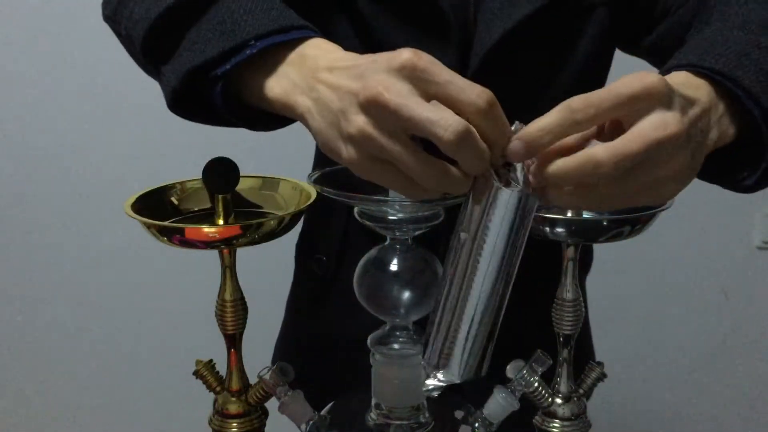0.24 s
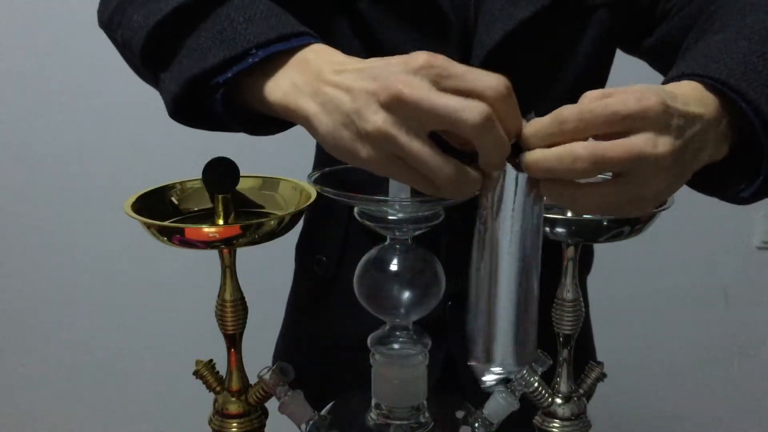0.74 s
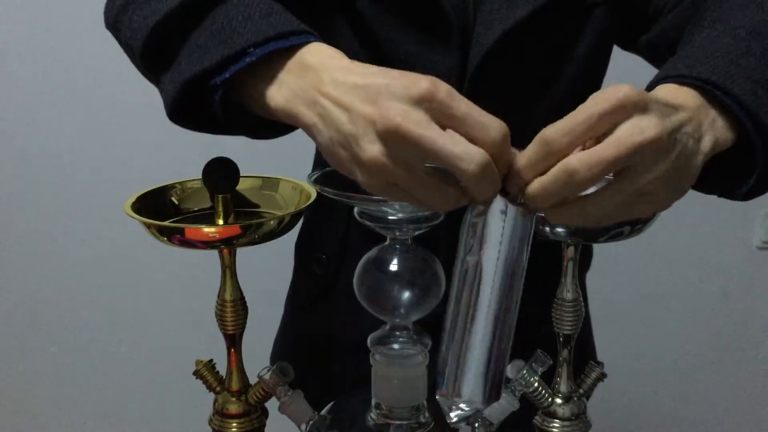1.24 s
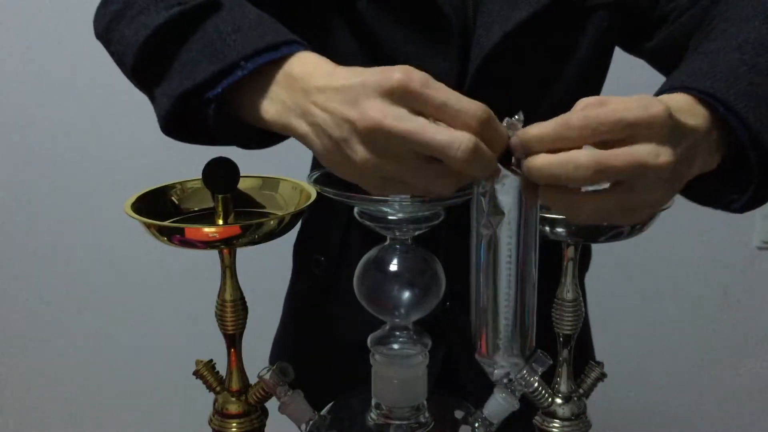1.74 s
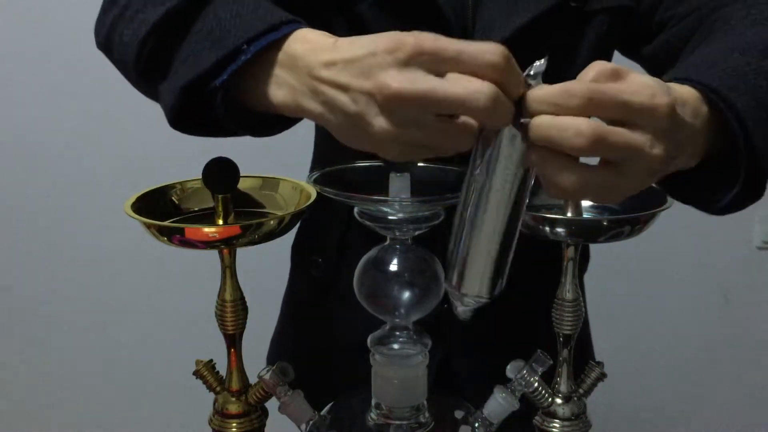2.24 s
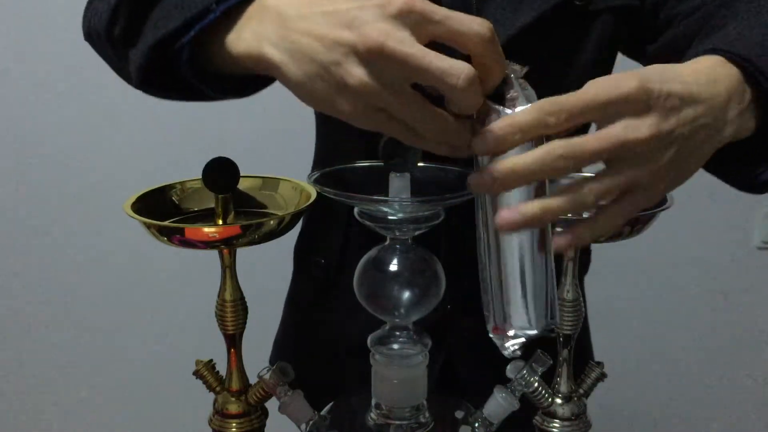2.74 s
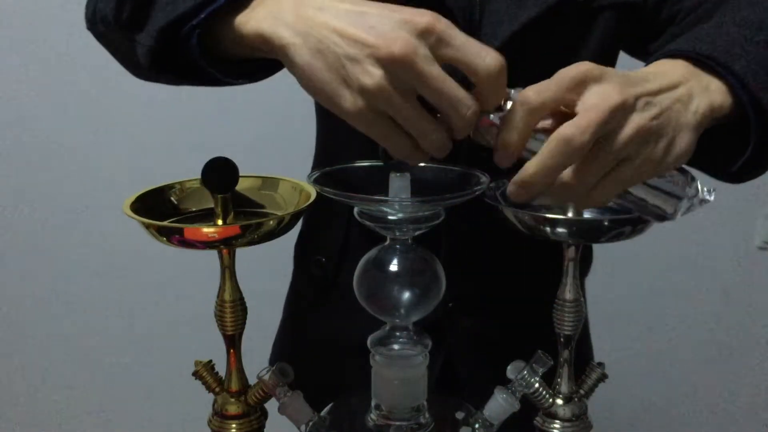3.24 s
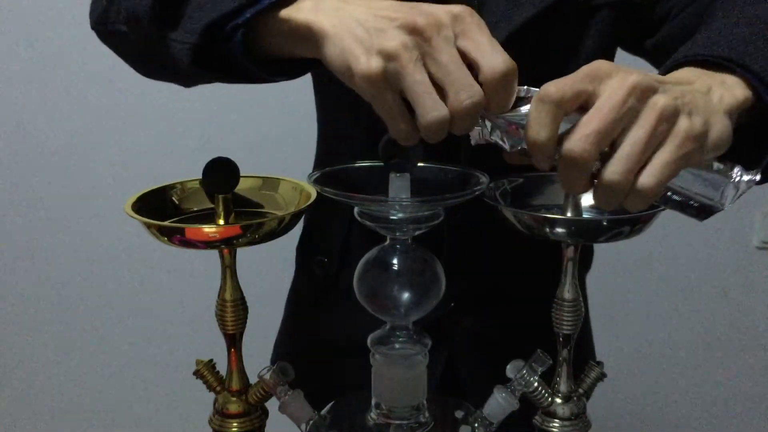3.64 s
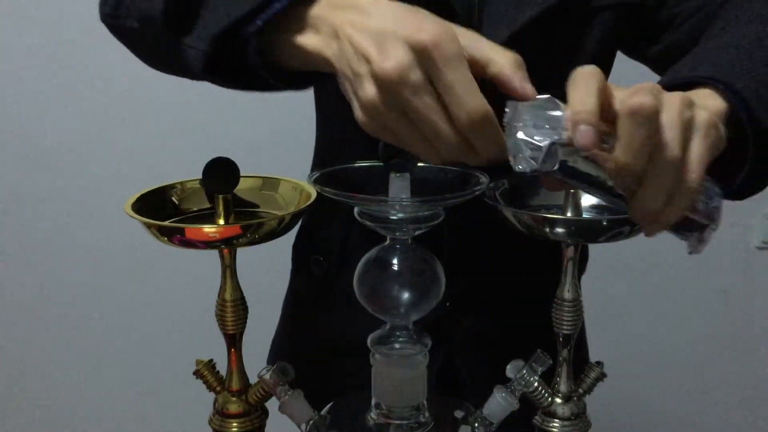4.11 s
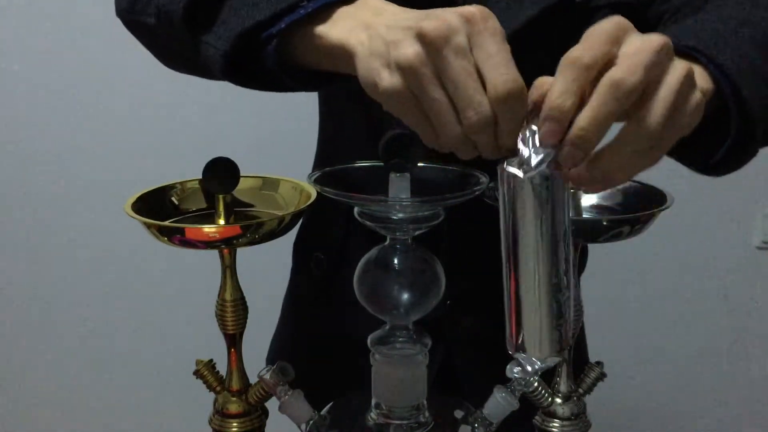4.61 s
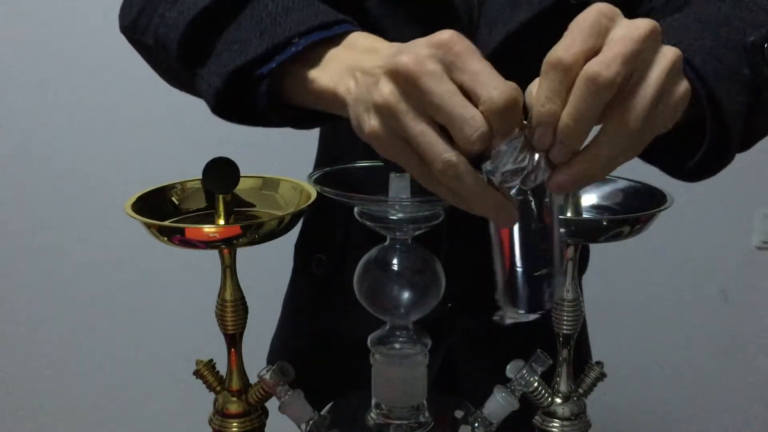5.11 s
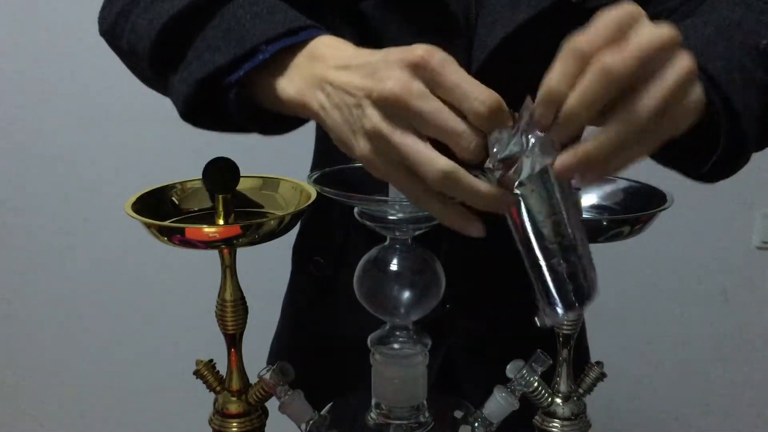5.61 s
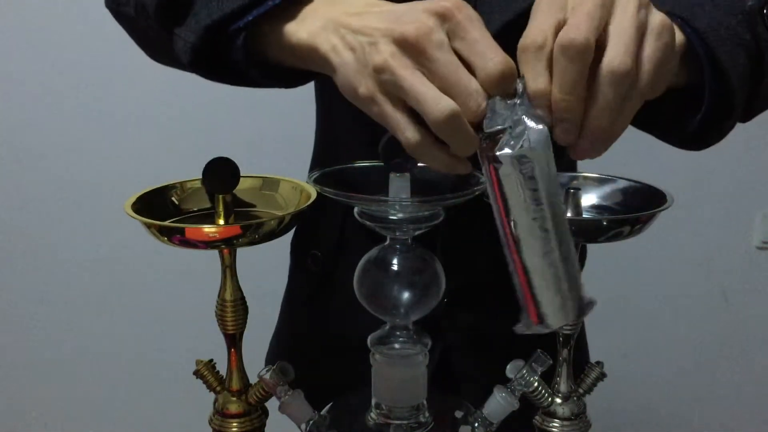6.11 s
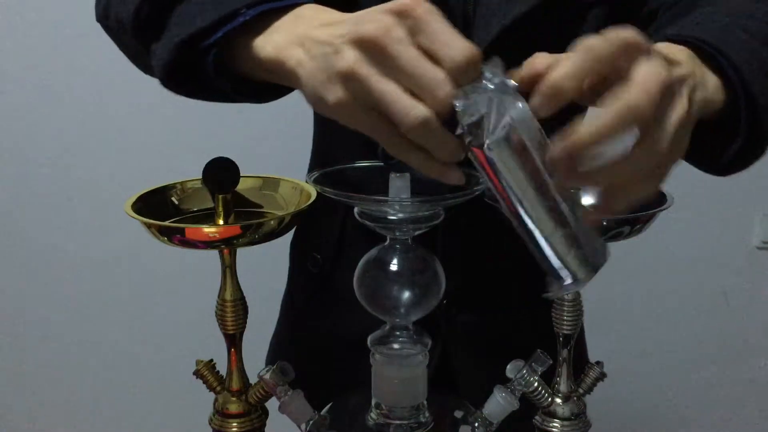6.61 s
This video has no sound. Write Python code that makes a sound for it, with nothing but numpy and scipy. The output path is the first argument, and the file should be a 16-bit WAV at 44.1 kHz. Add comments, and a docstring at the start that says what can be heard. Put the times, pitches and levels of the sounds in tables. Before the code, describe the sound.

Stiff foil crackles continuously but irregularly under working fingers: tiny ticks, sharp metallic pops and occasional louder cracks. It thickens around two and a half to three seconds, stops and starts through the middle, then gives its strongest snaps just after six seconds and near the end, with a low thud. Fairly close pickup in a small reverberant room, quiet hum below.

```python
"""Fingers twist and tear open a foil-wrapped roll in a bare, hard-walled room, an arm's length from a camera.
Each crease buckles in a snap about a millisecond long: a patch of foil rings, its edge cracks, the dent pops.
Lesser snaps and small creases fall at random while the fingers move and fill the gaps; the room answers every snap; a low hum and faint hiss lie beneath."""
import sys
import numpy as np
from scipy import signal
from scipy.fft import rfft, irfft, next_fast_len
from scipy.io import wavfile
from scipy.ndimage import map_coordinates

SR = 44100
rng = np.random.default_rng(int(sys.argv[2]) if len(sys.argv) > 2 else 0)


def to_wav(sig):
    """Store sig (one row per channel, or 1-D mono) as 16-bit WAV at the path in sys.argv[1].

    Samples outside -1..1 are clipped; the rate is SR.
    """
    pcm = np.clip(np.atleast_2d(sig), -1, 1) * 32767
    pcm = np.round(pcm).astype(np.int16)
    wavfile.write(sys.argv[1], SR, pcm.T)  # frames by channels


N = 302526

# the loudest buckling creases: (s, patch dB, patch pitch Hz, crack dB, crack pitch Hz, dent dB, dent pitch Hz)
SNAPS = [(0.014, -43.5, 1460, -38, 8610, -42.5, 704), (0.0817, -24.5, 3340, -23.5, 6400, -43.5, 930),
         (0.1681, -44, 2130, -37, 6320, -57, 790), (0.1811, -34, 1520, -52, 8130, -38.5, 800),
         (0.1851, -26.5, 2480, -20, 10860, -35, 860), (0.2713, -26, 1870, -34, 5600, -36.5, 940),
         (0.2845, -35, 1540, -27.5, 7980, -40, 870), (0.4061, -39, 2130, -38, 7510, -54, 810),
         (0.4612, -48, 2990, -37, 6540, -54, 790), (0.4713, -40, 3200, -34, 5900, -50, 995),
         (0.4751, -34, 3240, -41, 6180, -57, 950), (0.4941, -35, 2780, -30, 8960, -46, 613),
         (0.4976, -22.5, 2840, -25, 10300, -43.5, 570), (0.5055, -36, 2760, -37, 8490, -60, 670),
         (0.5507, -35, 3090, -37, 7560, -56, 840), (0.5885, -36, 3360, -22, 7800, -53, 870),
         (0.6097, -36, 2380, -35, 5950, -47, 820), (0.6195, -46, 2640, -31, 8200, -66, 560),
         (0.6653, -34, 3300, -29, 8400, -51, 960), (0.688, -34, 2130, -40, 6710, -46, 940),
         (0.6935, -40, 3210, -22.5, 6360, -55, 750), (0.7043, -38, 3200, -29, 6320, -45, 665),
         (0.7121, -28, 3550, -36, 7710, -38, 557), (0.7228, -26, 2830, -32, 6610, -39, 815),
         (0.7357, -30.5, 3200, -35, 7840, -66, 590), (0.7451, -33, 2730, -29, 6200, -62, 580),
         (0.8325, -33.5, 2470, -29, 7540, -43.5, 684), (0.8615, -44, 2350, -24, 11540, -71, 890),
         (0.9112, -62, 2200, -32.5, 6260, -77, 990), (1.0304, -43, 3850, -20.5, 8000, -61, 630),
         (1.0382, -32.5, 2520, -23, 9610, -39, 590), (1.0643, -32, 3200, -28.5, 6800, -36, 596),
         (1.1315, -39, 3830, -34.5, 6170, -50, 730), (1.1517, -56, 1330, -34, 6160, -34, 840),
         (1.224, -35.5, 2990, -30.5, 9760, -48, 750), (1.3036, -37, 2800, -32, 8000, -64, 760),
         (1.31, -32, 3270, -29, 8100, -47, 800), (1.3634, -26.5, 3470, -13.5, 9500, -46, 920),
         (1.3751, -48, 3410, -47, 6220, -75, 930), (1.3787, -22.5, 3330, -38, 6030, -65, 950),
         (1.386, -35, 2650, -25, 7500, -61, 900), (1.4328, -38, 2450, -30, 10200, -60, 920),
         (1.4731, -20, 2710, -28, 6160, -42, 845), (1.5761, -43, 2150, -19, 11800, -60, 630),
         (1.5858, -34, 2560, -39, 6500, -41.5, 770), (1.6073, -40, 2440, -35, 10030, -57, 760),
         (1.6124, -30.5, 3520, -33, 7610, -50, 760), (1.619, -40, 2250, -39, 9370, -44.5, 660),
         (1.628, -48, 3060, -32, 8390, -55, 770), (1.6612, -41, 3760, -31.5, 7330, -58, 870),
         (1.6688, -45, 2430, -35, 8460, -47, 790), (1.679, -44, 3160, -40, 8000, -64, 750),
         (1.6941, -54, 1600, -51, 6120, -41.5, 750), (1.7943, -38, 1990, -36, 7770, -50, 890),
         (1.8017, -40, 2010, -54, 6670, -62, 780), (1.8215, -41.5, 2110, -39.5, 5710, -48, 880),
         (1.8307, -36, 2600, -34, 6750, -43, 960), (1.9015, -41, 3700, -52, 5790, -59, 930),
         (1.9059, -41, 2550, -36.5, 6800, -63, 810), (1.9383, -46, 2330, -29, 7750, -66, 950),
         (1.9578, -41.5, 1540, -14, 10100, -43.5, 950), (1.9628, -33, 3640, -28, 9480, -57, 890),
         (1.9799, -36.5, 1860, -26, 6600, -44.5, 700), (1.9915, -32, 3650, -29, 9440, -61, 780),
         (1.9955, -43, 2930, -34, 11150, -52, 890), (2.0891, -25, 2970, -23.5, 7850, -53, 830),
         (2.0975, -31.5, 2460, -39, 5990, -49, 586), (2.1078, -31, 1970, -28, 6090, -36, 653),
         (2.1133, -44, 2590, -39, 5730, -59, 590), (2.1292, -30.5, 2720, -22.5, 6150, -63, 610),
         (2.1611, -36, 2040, -20, 7400, -49, 740), (2.2331, -39, 2960, -22.5, 7200, -71, 540),
         (2.2984, -40, 2780, -31.5, 7820, -61, 840), (2.3558, -56, 3440, -31.5, 5910, -73, 660),
         (2.3643, -51, 3680, -29, 7830, -57, 780), (2.3764, -45, 3770, -34, 10860, -60, 820),
         (2.3813, -38.5, 3360, -28, 8160, -41.5, 825), (2.4022, -31, 1420, -16.5, 11400, -28, 900),
         (2.409, -27, 2400, -25, 7140, -40, 600), (2.4483, -42, 1360, -46, 8810, -34, 850),
         (2.4604, -31, 2720, -29, 6030, -64, 750), (2.6135, -48, 3860, -23, 8500, -56, 780),
         (2.6171, -48, 3640, -38, 9080, -69, 720), (2.6276, -50, 2480, -35, 7970, -42, 535),
         (2.6404, -44, 3660, -33, 7220, -58, 570), (2.6493, -41, 3610, -39, 5830, -61, 890),
         (2.66, -35, 3840, -34, 7760, -58, 760), (2.681, -29.5, 2540, -30, 10270, -44, 746),
         (2.6854, -29.5, 1870, -32, 5770, -60, 880), (2.6916, -28, 3440, -24, 8720, -46, 950),
         (2.6987, -28, 2000, -27, 6510, -36, 870), (2.7084, -28, 2970, -31, 7660, -41.5, 644),
         (2.7135, -29, 2140, -32, 5760, -40, 550), (2.7172, -27, 2930, -43, 5880, -40, 520),
         (2.7362, -33, 1900, -25, 6100, -41, 510), (2.7501, -31, 1910, -36, 6010, -46, 880),
         (2.7642, -29, 2270, -18, 11850, -39, 530), (2.7775, -24.5, 2840, -24.5, 6340, -31, 790),
         (2.8072, -36, 1840, -31, 6800, -50, 970), (2.8606, -26.5, 1980, -24, 8410, -43, 720),
         (2.869, -32, 2000, -37, 7390, -42, 920), (2.8734, -30, 2700, -40, 5890, -42, 760),
         (2.8984, -32, 2330, -44, 6300, -35, 650), (2.9815, -26, 3130, -24, 6760, -51, 700),
         (2.9941, -28.5, 2120, -38, 6000, -45, 540), (3.0, -25, 3050, -26.5, 9440, -40, 520),
         (3.0211, -34, 2980, -43, 5910, -60, 970), (3.0406, -39, 2270, -29, 10760, -62, 990),
         (3.0819, -57, 3090, -34.5, 6730, -61, 780), (3.1372, -34, 2540, -21.5, 8800, -42.5, 786),
         (3.1435, -43, 3570, -40, 8800, -57, 940), (3.1825, -33.5, 2380, -23.5, 11200, -49, 830),
         (3.2151, -32.5, 3560, -27, 8200, -46, 870), (3.2319, -37, 2940, -38, 8820, -48, 880),
         (3.2358, -31, 2970, -28, 10230, -51, 870), (3.241, -30.5, 2930, -31, 7870, -59, 910),
         (3.2519, -35, 3090, -38, 8030, -46, 880), (3.3422, -23.5, 2900, -33, 6240, -46, 790),
         (3.3601, -26, 1570, -16.5, 7650, -34.5, 770), (3.3822, -27, 2850, -28, 7940, -40, 950),
         (3.3991, -29.5, 1940, -30, 6800, -47, 950), (3.4145, -36, 2040, -24.5, 8400, -42.5, 840),
         (3.5607, -55, 3620, -28.5, 6700, -75, 910), (3.6171, -44, 2230, -40, 6400, -63, 940),
         (3.6569, -30.5, 2960, -28.5, 9100, -67, 770), (3.689, -38, 3340, -42, 6480, -50.5, 560),
         (3.7134, -32, 3130, -33, 5750, -49, 890), (3.7468, -31, 3860, -22, 9800, -58, 880),
         (3.7578, -34, 2540, -31, 6440, -57, 880), (3.7657, -39, 3060, -23, 9570, -64, 930),
         (3.7769, -43, 2760, -36, 8470, -66, 820), (3.8128, -42, 2690, -23.5, 8140, -69, 760),
         (3.8402, -25, 3520, -20, 6850, -46, 890), (3.8485, -35, 1920, -27, 6050, -40, 880),
         (3.9139, -38, 2950, -29.5, 8430, -64, 940), (3.9271, -33, 3030, -38, 6240, -57, 930),
         (3.9466, -35, 3070, -31, 9680, -45, 705), (3.9754, -32.5, 3270, -32, 8160, -41, 800),
         (3.9925, -31, 3310, -43, 6160, -39, 820), (3.9981, -34, 2240, -27.5, 8060, -39, 940),
         (4.0747, -36, 3080, -32, 8260, -58, 870), (4.0928, -30.5, 3940, -27.5, 8040, -45.5, 700),
         (4.1405, -29.5, 3170, -39, 5870, -38, 680), (4.2333, -33.5, 3260, -30, 11340, -63, 650),
         (4.2378, -41, 1900, -36, 7640, -48, 840), (4.2443, -38, 2780, -26.5, 10560, -46, 935),
         (4.2533, -30, 3280, -34, 10200, -47, 685), (4.2999, -34, 2190, -46, 7830, -53, 790),
         (4.3184, -38, 2670, -46, 5850, -52, 840), (4.3412, -30, 1890, -33.5, 7070, -56, 910),
         (4.3567, -30.5, 2870, -37, 5760, -44, 760), (4.3739, -44, 2320, -35, 6430, -52, 950),
         (4.3784, -29, 2920, -39, 8100, -52, 970), (4.3825, -33, 3150, -24.5, 8870, -46, 930),
         (4.406, -30, 2520, -26, 5800, -42, 820), (4.422, -22, 2640, -26, 6200, -34, 825),
         (4.4276, -26.5, 1530, -20.5, 9600, -38, 810), (4.4363, -39, 1930, -28, 7810, -53, 780),
         (4.4451, -38, 1820, -36, 6840, -48, 900), (4.4964, -33.5, 1760, -46, 5780, -39.5, 725),
         (4.5372, -39, 2590, -44, 8430, -40.5, 810), (4.5413, -26, 2220, -22, 8140, -37.5, 810),
         (4.6248, -39.5, 1560, -51, 5890, -34.5, 740), (4.7219, -24.5, 2650, -27.5, 8300, -51, 920),
         (4.7263, -48, 2550, -46, 7020, -54, 890), (4.7834, -42, 2560, -48, 6900, -61, 840),
         (4.8579, -40, 2610, -42, 7610, -45.5, 576), (4.8621, -32, 2490, -35, 7190, -52, 590),
         (4.9565, -40, 3310, -33, 11120, -53, 600), (4.9679, -36, 3150, -36, 6190, -36.5, 624),
         (4.9723, -28.5, 2800, -34, 6700, -43, 664), (4.9766, -25, 3160, -42, 6440, -45, 630),
         (4.9864, -22.5, 3360, -41, 5800, -42.5, 800), (4.9951, -24.5, 3500, -43, 6500, -61, 680),
         (5.0414, -31, 3670, -39, 6040, -55, 950), (5.0873, -24, 3240, -15.5, 7650, -36.5, 710),
         (5.1523, -29, 3840, -17, 11200, -44, 700), (5.1739, -41, 3750, -24, 8950, -50, 640),
         (5.1886, -20, 2920, -29, 6950, -42, 820), (5.193, -31, 3470, -38, 8030, -40.5, 790),
         (5.2138, -34, 3430, -42, 6010, -53, 840), (5.2876, -38, 2720, -53, 6070, -64, 970),
         (5.3187, -29, 3160, -54, 5750, -45.5, 980), (5.3641, -33.5, 3230, -57, 6600, -69, 1010),
         (5.3998, -37, 2020, -43, 6750, -59, 990), (5.4143, -28, 3800, -22, 10200, -67, 930),
         (5.4787, -24, 2500, -38, 5830, -40, 835), (5.487, -24.5, 2220, -25, 7200, -41.5, 830),
         (5.5109, -30.5, 3170, -25.5, 7400, -63, 840), (5.5732, -31, 3920, -22.5, 7950, -54, 750),
         (5.5813, -30.5, 2100, -23, 8990, -58, 730), (5.5926, -22, 2100, -45, 5900, -29, 880),
         (5.711, -37, 2950, -41, 7710, -42.5, 900), (5.7367, -32, 2980, -40, 6640, -53, 940),
         (5.7472, -27.5, 2780, -25, 7300, -42, 890), (5.7565, -31, 2180, -37, 8540, -43, 730),
         (5.7623, -38, 2190, -39, 6570, -38.5, 660), (5.7675, -23, 3300, -19.5, 8600, -49.5, 580),
         (5.8357, -34.5, 2650, -43, 6390, -61, 820), (5.857, -41, 1970, -33, 7700, -66, 830),
         (5.8741, -35, 3630, -33, 6470, -69, 810), (5.9087, -47, 2540, -37, 6640, -59, 720),
         (5.9235, -36, 2700, -40, 6290, -57, 940), (5.976, -33.5, 3600, -29, 6200, -61, 920),
         (5.9854, -33, 3110, -30, 7900, -67, 890), (6.112, -45, 3340, -47, 9240, -53, 840),
         (6.1165, -27, 3150, -20.5, 6200, -46, 890), (6.1413, -21, 3370, -19, 6460, -45, 900),
         (6.1461, -30, 2540, -34, 9430, -53, 640), (6.1545, -41, 3330, -28, 7750, -45, 930),
         (6.1654, -30, 2830, -27, 6810, -57, 930), (6.2004, -26, 2340, -28, 7120, -37, 746),
         (6.2069, -32, 3460, -40, 8460, -51, 910), (6.2176, -15, 2040, -13.5, 8300, -28.5, 930),
         (6.3512, -24.5, 2470, -49, 5950, -62, 980), (6.5053, -31, 3470, -41, 6600, -45, 840),
         (6.5179, -54, 2150, -35, 7550, -57, 890), (6.5255, -33.5, 3900, -37.5, 6380, -59, 830),
         (6.535, -30, 2070, -31, 6740, -39.5, 880), (6.5656, -42, 3170, -30, 7430, -58, 780),
         (6.6039, -52, 2300, -47, 5680, -65, 950), (6.6104, -22, 3130, -30, 8300, -54, 980),
         (6.6876, -33.5, 3750, -49, 6000, -62, 680), (6.702, -31, 3140, -38, 5790, -52, 1000),
         (6.7075, -28, 2980, -38, 6330, -46, 1000), (6.728, -15.5, 4000, -15.5, 8200, -28, 544),
         (6.7508, -52, 2620, -21, 6720, -25.5, 770), (6.7545, -17, 2500, -20, 6900, -30.5, 726)]
# handling: (s, effort dB, share sent to the room rather than at the microphone dB)
HANDLING = [(0.0, -40.5, -5), (0.5, -52, -1), (0.65, -48, -1), (1.09, -46, 0), (1.47, -49.5, -3.5), (1.74, -42, -3),
            (2.27, -51, -1.5), (2.48, -39.5, -2), (2.79, -41, -3.5), (3.5, -50, 1), (3.92, -44, -4.5), (4.15, -47.5, -2.5),
            (4.47, -45.5, -3), (4.76, -49.5, -4), (5.64, -48, -4.5), (6.11, -53, -5.5), (6.27, -45, -0.5), (6.86, -40, -3.5)]
CREASE = [(410, -39), (700, -3.5), (1660, -4.5), (3110, 1), (4880, 4.5), (9030, -12), (10500, -10), (14000, -1.5)]  # small creases: (Hz, dB per Hz)
ROOM = [(300, 0.53), (800, 0.38), (2100, 0.54), (5500, 0.48), (14600, 0.43)]  # (Hz, t60 s)
ROOM_COLOUR = [(250, -2.5), (500, -4), (1000, -1.5), (2500, 2), (6000, -7), (14000, -2)]  # (Hz, dB)
AIR = [(20, -8), (40, -30), (90, -1), (160, -6), (400, -10), (2000, -18), (15000, -24)]  # room tone: (Hz, dB)
HUM = [(0.0, -69, -74), (0.07, -70, -87), (0.29, -62, -80), (0.48, -70, -91), (1.53, -75.5, -89), (2.64, -73.5, -75),
       (5.29, -82, -89), (5.41, -74, -93), (5.64, -76, -75), (5.69, -79, -83), (6.78, -71.5, -71), (6.86, -90, -82)]
LEAD_S = .004  # fixed
TOP_HZ, EDGE_HZ = 16500, 15300  # fixed
# the roll knocks dully in the grip: (s, peak dB, pitch Hz)
KNOCKS = [(0.707, -59, 302), (2.4, -51, 320), (2.734, -34.5, 406), (2.774, -39.5, 313), (2.893, -39, 400), (2.997, -45, 407),
          (3.359, -43, 278), (3.998, -44, 303), (4.097, -46, 320), (4.139, -44, 357), (4.423, -58, 390),
          (5.764, -40, 400), (6.752, -27.5, 258)]
MICROPHONE = [(450, -0.5), (750, -2.5), (1350, 7.5), (2500, -1), (4900, 0), (6500, 1.5), (7600, -4.5), (9000, -3), (10400, -8.5), (12500, -4.5), (15000, -8)]  # (Hz, dB)
# lesser snaps fall at random: usual (dB over the handling effort, pitch Hz, scatter dB, relative pitch scatter)
LESSER_PATCH, LESSER_CRACK, LESSER_DENT = (1, 2590, 3.8, 0.26), (1, 8400, 3.4, 0.28), (-16.5, 803, 7, 0.18)
LESSER_PER_S = 40  # fixed
# the fingers hold still: (from s, to s)
PAUSES = [(.32, .39), (.925, 1.028), (1.235, 1.29), (1.7, 1.79), (2.3, 2.354), (2.47, 2.61), (3.26, 3.34), (3.42, 3.555),  # fixed
          (4.19, 4.23), (4.88, 4.954), (5.22, 5.285), (5.6, 5.695), (5.99, 6.09), (6.225, 6.345), (6.42, 6.5), (6.615, 6.67), (6.775, 6.86)]  # fixed
STILL_DB = -18  # fixed; small creases while the fingers rest
WAVER_DB, WAVER_PER_S = 2.5, 9  # both hums waver at random
KNOCK_CYCLES = 12.3  # cycles to die by 60 dB


def amp(db):
    return 10 ** (np.asarray(db) / 20)


def unit(x):
    """Rms 1."""
    return x / np.sqrt(np.mean(x ** 2) + 1e-20)


def along(points, hz):
    """(Hz, value) points on a log axis."""
    f, v = np.transpose(points)
    return np.interp(np.log(hz + 1), np.log(f + 1), v)


def curves(rows):
    """One value per sample for each column after the time."""
    s, *cols = np.transpose(rows)
    return [np.interp(np.arange(N) / SR, s, c) for c in cols]


def filtered(x, response):
    """x times a response of frequency."""
    m = next_fast_len(x.shape[-1] + 8192)
    return irfft(rfft(x, m) * response(np.fft.rfftfreq(m, 1 / SR)), m)[..., :x.shape[-1]]


def placed(starts_s, shapes):
    """Sums one short shape per start time."""
    at = np.round(starts_s * SR).astype(int)[:, None] + np.arange(shapes.shape[1])
    return np.bincount(at.ravel(), shapes.ravel(), N + SR)[:N]


def snaps(effort_db):
    """A release under a millisecond long, then a weak rattle of the neighbouring foil, heard through three resonances."""
    s, patch_db, patch_hz, crack_db, crack_hz, dent_db, dent_hz = np.vstack([SNAPS, lesser_snaps(effort_db)]).T
    t = np.arange(SR // 30) / SR
    chance = rng.standard_normal((len(s), len(t)))
    release_s = 0.0015 * np.exp(0.6 * chance[:, -1:])  # some creases let go at once, some tear
    release = (chance + 1.4 * (t < .00008)) * amp(-60 * t / release_s) * (1 - np.exp(-t / .00005))
    rattle = chance * amp(-15 - 60 * t / .022)  # fixed
    # the crease creeps for a few milliseconds before it lets go
    creep = chance[:, ::-1] * amp(-19 + 3 * chance[:, -2:-1] - 60 * (LEAD_S - t) / .007) * (t < LEAD_S)  # fixed
    release, rattle = (np.roll(v, round(LEAD_S * SR), axis=1) for v in (release, rattle))
    release = release + creep
    patch = rung(release + rattle, patch_hz, 2.25, patch_db + 2.0)
    crack = rung(release + 0.2 * rattle, crack_hz, 1.57, crack_db + 1.5)
    dent = rung(release + 2.9 * rattle, dent_hz, 2.56, dent_db + 2.5)
    # summed over all directions the ragged spectra even out: the room hears a plain click through broader resonances
    click = np.ones((len(s), 1)) * (t == 0)
    around = rung(click, patch_hz, 1.52, patch_db + 0.0) - rung(click, crack_hz, 1.07, crack_db + 1.0) + rung(click, dent_hz, 2.36, dent_db + 2.5)
    return placed(s - LEAD_S, patch + crack + dent), placed(s, around)


def small_creases(level_db, per_second=450, spread_db=8.0):
    """Many tiny buckles of very unequal size, each a cycle or two at its own pitch."""
    draw = rng.random((round(N / SR * 900), 4))  # fixed
    draw = draw[draw[:, 3] < per_second / 900]
    t = np.arange(SR // 250) / SR
    hz = 1000 * (14000 / 1000) ** draw[:, 1:2]
    size = amp(-spread_db * np.log(draw[:, 2:3] + .06) + along(CREASE, hz)) * hz  # fixed
    ticks = placed(draw[:, 0] * N / SR, size * np.sin(2 * np.pi * hz * t) * np.exp(-t * hz / 1.3))  # fixed
    return amp(level_db) * unit(ticks)


def room(x):
    """Bare walls: each frequency dies at its own speed; a new tail every fifth of a second as the hands move."""
    out, step = np.zeros(N + SR), SR // 5
    for start in range(0, N, step):
        hz, t, z = signal.stft(rng.standard_normal(SR // 2), SR, nperseg=256)
        tail = signal.istft(z * amp(-60 * t / along(ROOM, hz)[:, None]), SR, nperseg=256)[1]
        tail = tail * (1 - np.exp(-np.arange(len(tail)) / SR / 0.0015))  # reflections build up
        lumps = np.repeat(rng.standard_normal(len(tail) // 32 + 1), 32)[:len(tail)]  # fixed
        tail = tail * amp(3.95 * lumps * np.exp(-np.arange(len(tail)) / SR / 0.049))  # early echoes arrive one by one
        answer = signal.fftconvolve(x[start:start + step], tail / np.linalg.norm(tail))
        out[start:start + len(answer)] += answer
    return filtered(out[:N], lambda hz: amp(along(ROOM_COLOUR, hz)))


def air():
    """Two wavering low hums over a faint, steady room tone."""
    low_db, upper_db = (db + WAVER_DB * wobble(WAVER_PER_S) for db in curves(HUM))
    narrow = lambda c, width: unit(filtered(rng.standard_normal(N), lambda hz: 1 / (1 + ((hz - c) / width) ** 2)))
    tone = unit(filtered(rng.standard_normal(N), lambda hz: amp(along(AIR, hz))))
    return amp(low_db) * narrow(64.2, 7.7) + amp(upper_db - 2.0) * narrow(121.9, 1.54) + amp(-72) * tone


def rung(pushes, hz, sharpness, db):
    """Each push through its own resonance; small sources radiate little below their pitch. Energy of 2 ms at db."""
    u = 1j * np.fft.rfftfreq(pushes.shape[1], 1 / SR) / hz[:, None]
    response = u / (1 + u / sharpness + u * u) * (u / (u + 0.65)) ** 2
    shapes = irfft(rfft(pushes) * response, pushes.shape[1])
    return shapes * (amp(db) * np.sqrt(SR / 500) / np.linalg.norm(shapes, axis=1))[:, None]  # fixed


def knocks():
    """A soft, low ring of the roll."""
    s, db, hz = np.transpose(KNOCKS)[..., None]
    t60 = KNOCK_CYCLES / hz
    t = np.arange(SR // 5) / SR
    return placed(s[:, 0], amp(db - 0.5 - 60 * t / t60) * np.sin(2 * np.pi * hz * t) * (1 - np.exp(-t / 0.001)))


def wobble(rate):
    """A smooth random curve, rate knots a second."""
    return map_coordinates(rng.standard_normal(int(N * 12 / SR) + 4), [np.arange(N) * np.clip(rate, .1, 12) / SR])  # fixed


def moving():
    """1 while the fingers work, 0 while they rest."""
    t = np.arange(N) / SR
    return 1 - sum((t > a) & (t < b) for a, b in PAUSES)


def lesser_snaps(effort_db):
    """Rows like those of SNAPS, at random moments of movement, as strong as the handling."""
    s = rng.random(round(LESSER_PER_S * N / SR)) * (N - 1) / SR
    z = np.clip(rng.standard_normal((6, len(s))), -2.5, 1.5)  # fixed
    at = (s * SR).astype(int)
    columns = [s]
    for k, (over_db, hz, scatter_db, spread) in enumerate((LESSER_PATCH, LESSER_CRACK, LESSER_DENT)):
        columns += [effort_db[at] + over_db + scatter_db * z[2 * k], hz * np.exp(spread * z[2 * k + 1])]
    return np.transpose(columns)[moving()[at] > 0]


def scene():
    """Foil, its room and the background."""
    effort_db, room_db = curves(HANDLING)
    creases = filtered(small_creases(effort_db - 7.5 + STILL_DB * (1 - moving())), lambda hz: 1 / (1 + (600 / (hz + 1)) ** 4))  # too small for bass
    direct, around = snaps(effort_db)
    rest = creases + knocks()
    return (direct + rest + room((around + rest) * amp(room_db)) + air())[None]


def record(dry):
    """The microphone's colour and its lopsided overload; the top of the treble is dropped, nothing above the limit."""
    picked = filtered(dry, lambda hz: amp(along(MICROPHONE, hz)))
    picked = picked / (1 + np.abs(picked / .78) ** 4) ** (1 / 4)  # fixed
    picked = picked + .2 * picked ** 4  # the loudest snaps rectify a little and leave a low thump
    return filtered(picked, lambda hz: np.where(hz < EDGE_HZ, 1, amp(-28)) * (hz < TOP_HZ))


dry = scene()
out = record(dry)
to_wav(out)
```